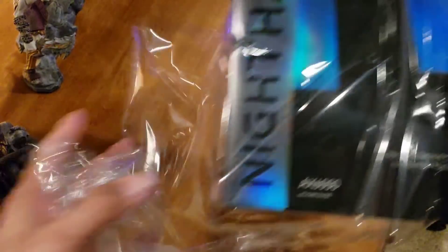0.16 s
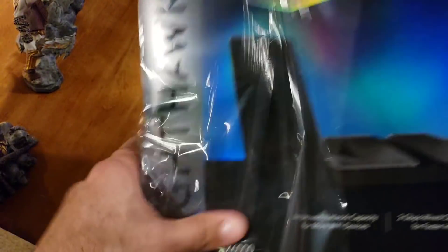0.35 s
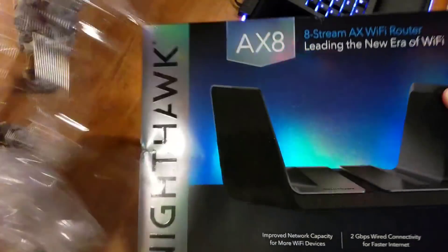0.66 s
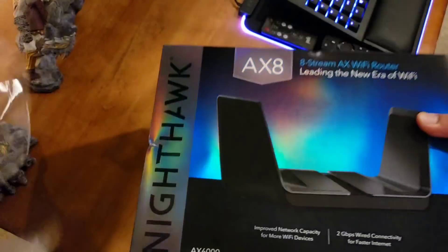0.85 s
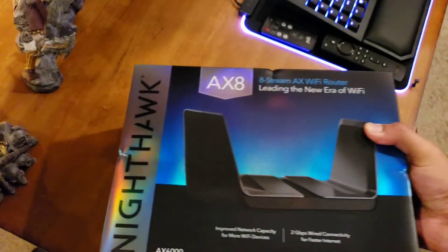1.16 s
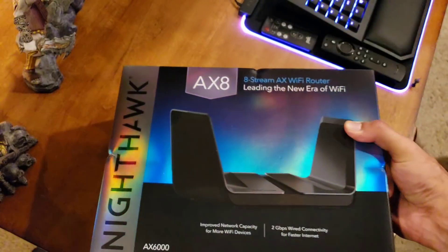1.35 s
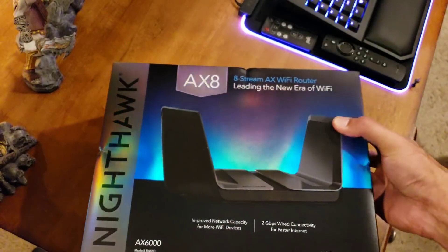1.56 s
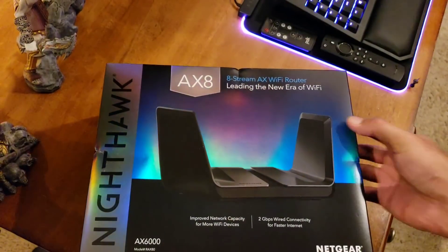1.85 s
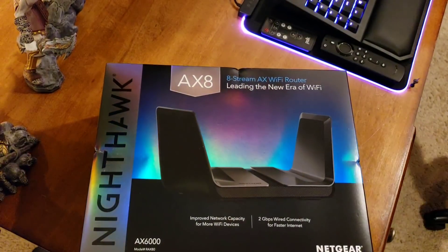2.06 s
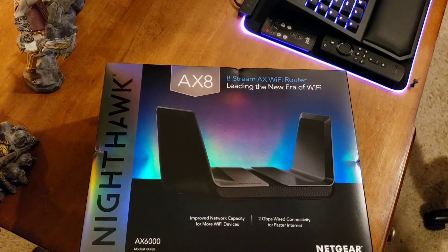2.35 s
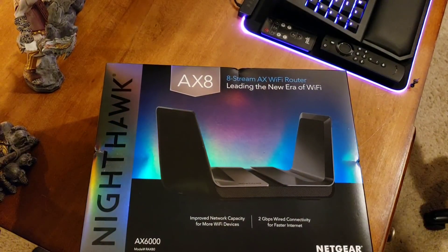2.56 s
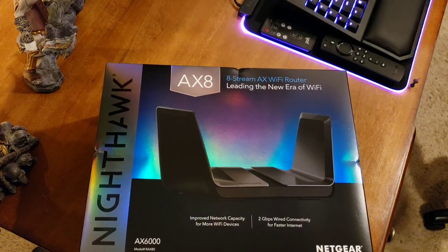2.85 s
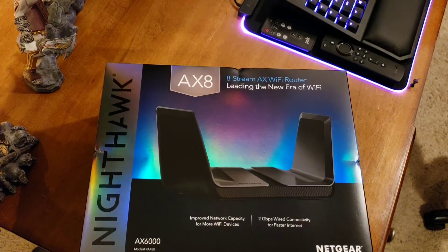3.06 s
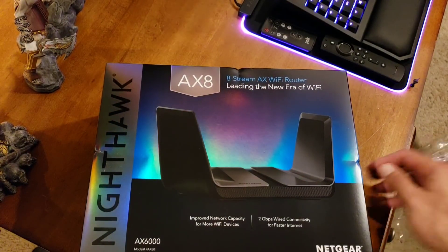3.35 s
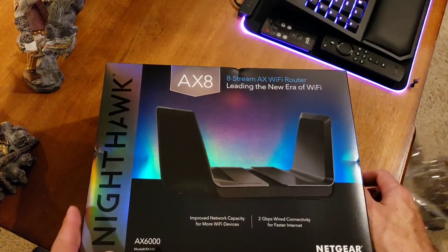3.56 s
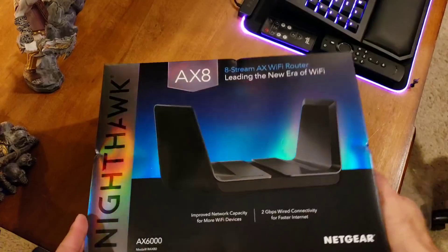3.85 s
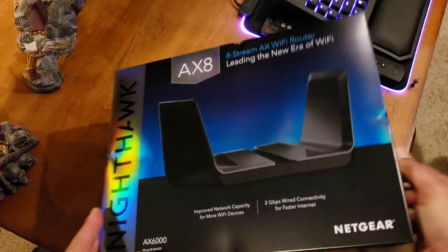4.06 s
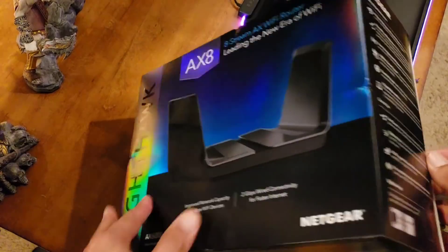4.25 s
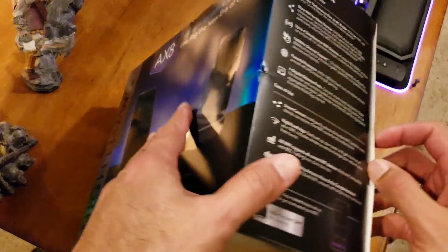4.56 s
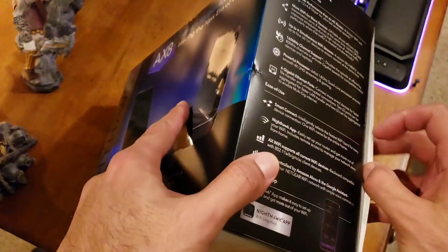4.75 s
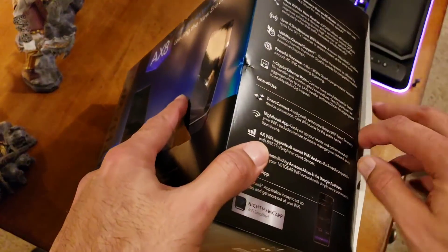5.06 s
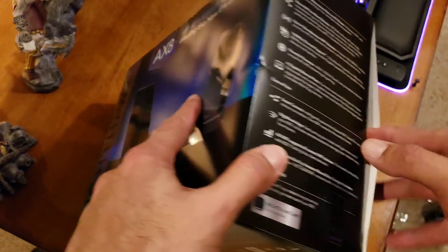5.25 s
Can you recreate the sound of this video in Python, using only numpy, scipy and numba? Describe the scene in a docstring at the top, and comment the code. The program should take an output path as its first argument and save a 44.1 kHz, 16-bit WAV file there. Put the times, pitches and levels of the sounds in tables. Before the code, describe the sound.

Close to the microphone in a small quiet room, plastic film crackles and snaps as it comes off a box. The cardboard box knocks a few times and lands on a desk with a hollow thud. The film is then scrunched up, the loudest moment, and fades to a few ticks. Afterwards skin rubs softly on the card, the box bumps as it is tipped, and fingernails click at the flap.

```python
"""Unwrapping a cardboard box.

Thin plastic wrap is pulled off, crumpled and dropped: its creases snap in dense showers.
The hollow box is set on a desk and thuds in its modes. Hands slide over it, tip it up and pick
at the flap: skin rasps, nails tick. Close microphone, small quiet room."""
import sys
import numpy as np
from scipy import signal
from scipy.fft import rfft, irfft
from scipy.io import wavfile
from scipy.ndimage import uniform_filter1d, map_coordinates
from numba import njit

SR = 44100
rng = np.random.default_rng(int(sys.argv[2]) if len(sys.argv) > 2 else 0)


def log_audio(samples):
    """Write samples as a 16-bit WAV file to the path given in sys.argv[1]."""
    # one column per channel
    frames = np.atleast_2d(samples).T
    # limit to full scale, then quantise
    limited = np.clip(frames, -1, 1)
    pcm = np.round(limited * 32767).astype(np.int16)
    wavfile.write(sys.argv[1], SR, pcm)


N = 237851

# film being worked: time_s, crackle_db, fine_re_crackle_db
FILM_LEVELS = [(0, -35.5, -4), (.11, -41.5, 3), (.16, -33.5, 0), (.21, -35, -1.5), (.25, -39, 0),
               (.43, -31.5, -2.5), (.445, -30, 2.5), (.53, -29, 3.5), (.595, -37.5, 6), (0.634, -26, 1.5),
               (.68, -37, 2.5), (.75, -37.5, 0), (.8, -33.5, 5), (.92, -33, -1), (1.07, -36, -1),
               (1.12, -28.5, -3), (1.18, -33, 2.5), (1.28, -32, -1.5), (1.4, -33.5, -6.5),
               (1.47, -40.5, -6), (1.7, -43.5, -0.5), (1.85, -44.5, -11), (2.05, -43.5, -9),
               (2.18, -40, 6.5), (2.35, -33, 1), (2.395, -23, 2.5), (2.57, -21.5, 1), (2.62, -25, -1),
               (2.71, -26.5, 1), (2.75, -34.5, -1.5), (2.785, -51.5, 1), (2.85, -41, -3), (3.0, -41, 0),
               (3.049, -34, -0.5), (3.1, -44, 3.5), (3.27, -49, 1.5), (3.43, -57.5, -6), (3.62, -59, 4)]
# single loud creases: start_s, ring_peak_db, pitch_hz, treble_re_ring_db
CREASE_SNAPS = [(0.0347, -15.5, 3420, -17), (0.0754, -16, 11600, -15), (0.0894, -17.5, 2620, -3),
                (0.1349, -15.5, 3020, -4), (0.1838, -15.5, 1500, -15), (0.2171, -13, 10600, -15),
                (0.395, -13.5, 11900, -7), (0.4399, -12, 1510, -13), (0.4485, -17, 10680, 9.5),
                (0.5026, -6, 11900, 10), (0.5351, -15.5, 11100, 6), (0.6081, -14, 12060, 2),
                (0.6444, -12, 9990, -5), (0.688, -15, 11630, -12), (0.6998, -16, 2130, -6),
                (0.7251, -16, 11280, -9), (0.7605, -16, 10420, -7), (0.7847, -15.5, 7070, 0),
                (0.8344, -19, 7360, -2), (1.0391, -14, 13950, -7), (1.049, -19, 2410, -9),
                (1.062, -15.5, 1980, -12), (1.0892, -17, 2800, -18), (1.1752, -10, 2280, -4),
                (1.2155, -15, 11280, -3), (1.2814, -15, 10250, 0), (1.2864, -12, 2740, -17),
                (1.3221, -15, 11800, -8), (1.422, -12.5, 2670, -22), (1.4517, -19, 3720, -8),
                (1.4822, -13.5, 3130, -24), (1.5206, -21, 12140, -7), (1.5582, -26, 2930, 1),
                (1.6019, -24.5, 3010, -19), (1.6801, -24, 2500, -8), (1.7428, -23.5, 10590, -15),
                (1.7511, -21, 4220, -12), (1.8169, -24.5, 1960, -22), (1.8392, -27, 6760, -7),
                (1.8813, -13.5, 7900, -10), (1.9681, -14.5, 8400, -23), (2.0216, -22.5, 6000, -11),
                (2.0305, -17.5, 2480, -22), (2.0426, -15, 6060, -15), (2.0536, -27, 3500, -6),
                (2.0822, -23, 2840, -15), (2.1488, -15.5, 9900, -17), (2.1667, -22, 4140, 7),
                (2.1903, -18, 6370, -8), (2.2076, -17.5, 6980, -7), (2.2953, -12, 7300, -16),
                (2.3299, -9.5, 5100, -0.5), (2.3829, -4.5, 2570, 0.5), (2.4138, -4, 12600, 1),
                (2.4626, -8, 10500, 3), (2.4956, -4, 13010, -8), (2.5281, -2, 6100, -10),
                (2.5518, -6, 12200, -9), (2.5609, 4.5, 3330, -21), (2.5785, -3, 7400, -15),
                (2.4778, -13, 5500, -5), (2.6212, -6.5, 5600, -10), (2.6413, -7.5, 4200, -3),
                (2.8679, -21, 7200, -19), (2.9209, -22.5, 7860, -12), (3.1412, -19, 8140, -9),
                (3.15, -20.5, 4800, -19), (3.2163, -19.5, 10000, -14), (3.2572, -24, 2480, -15),
                (3.3158, -23.5, 6100, -22), (3.3813, -33, 8500, -8), (3.4754, -25, 7600, -20),
                (3.5078, -35, 4820, -13)]
# blows on the box: start_s, peak_db, spot_hz, spread_octaves
BOX_KNOCKS = [(.05, -30.5, 483, 0.64), (0.121, -37, 158, 0.19), (0.4393, -20, 614, 1.3),
              (0.627, -26.5, 520, 1.15), (.642, -23, 506, 0.33), (0.942, -34, 180, 0.7),
              (1.004, -30.5, 147, 0.41), (1.015, -29, 200, 0.83), (1.391, -25, 364, 0.57),
              (1.424, -18, 273, 1.06), (1.504, -34.5, 140, 0.58), (1.673, -30.5, 400, 1.9),
              (1.912, -19.5, 453, 1.9), (1.922, -17.5, 1500, 0.59), (1.923, -11.5, 224, 1.08),
              (2.388, -26, 260, 1), (3.472, -42, 420, 0.3), (3.631, -32, 303, 1.2),
              (3.725, -36.5, 805, 0.76), (3.792, -33, 554, 0.94), (3.898, -39, 405, 0.12),
              (4.014, -20, 830, 0.52), (4.018, -19, 230, 0.18), (4.298, -45, 199, 0.72),
              (4.7, -33.5, 179, 0.59), (4.772, -37, 175, 0.43), (4.926, -21.5, 684, 0.97),
              (4.971, -24, 457, 0.88), (5.091, -30, 900, 0.46), (5.099, -31.5, 404, 0.17),
              (5.152, -29, 390, 0.69), (5.331, -37, 219, 0.65)]
# hollow box: pitch_hz, level_db, t60_s
BOX_MODES = [(65, -13, .12), (105, -9, .14), (130, -9, .18), (180, -9, .09), (229, 0, .12), (280, -7, .07),
             (352, -4, .1), (420, -7, .09), (505, -8, .09), (600, -8, .09), (700, -10, .07), (855, -9, .05),
             (1050, -11, .045), (1440, -12, .035), (1700, -13, .035)]
# skin on glossy card: start_s, length_s, rub_db, fade_db, hiss_re_rub_db, hiss_rise_db, drum_re_rub_db
HAND_STROKES = [(3.602, 0.24, -51.5, 1, -8, -4, -1), (3.849, 0.19, -43.5, 5.5, -15, 9, -2.5),
                (3.974, .13, -32.5, 5, -13, 7, -0.5), (4.1, .26, -37, 7, 2.5, -7.5, -1),
                (4.348, 0.12, -41.5, 4, 6, -8, -7), (4.482, 0.25, -45, -0.5, 7.5, -18, -6.5),
                (4.724, 0.084, -51.5, 5, -17, 0, 5), (4.79, 0.096, -40.5, 3.5, -3.5, -2, -14),
                (4.898, 0.084, -34.5, 13.5, -11, -5, -1), (4.988, 0.049, -53, 0.5, -17, 0, 4),
                (5.046, 0.059, -47, -3.5, -7, -4, 0.5), (5.11, 0.26, -57.5, 2, -14, 0, 8),
                (5.28, .14, -53.5, -7.5, -8, 4, -12)]
# nails catching the card: start_s, ring_peak_db, pitch_hz, treble_re_ring_db
NAIL_PICKS = [(3.6338, -25.5, 3100, -6), (3.6555, -31, 8440, -15), (3.6773, -37, 3430, -12),
              (3.7242, -29.5, 8000, -18), (3.7278, -23, 1880, -17), (3.74, -29, 1620, -12),
              (3.7946, -28, 2760, -8), (3.9381, -29, 7300, -22), (4.0122, -20.5, 2070, -7),
              (4.0195, -23, 1890, -12), (4.7079, -29.5, 3300, -17), (4.9295, -11.5, 3450, -28),
              (4.9705, -35, 1710, -8), (5.0897, -13, 3360, -20), (5.0946, -13.5, 3330, -25),
              (5.099, -28, 2000, -16), (5.1516, -32.5, 3200, -21)]
# film's reflection off a close surface: time_s, amplitude_ratio
ECHO_SHARE = [(0, 0.068), (.6, 0.17), (1.7, 0.22), (2.3, 0.032)]
# room tone spectrum: freq_hz, density_db
ROOM_SPECTRUM = [(15, -34), (25, 4.5), (463, 1), (988, -19), (1520, -4), (1790, -19), (2280, -49.5),
                 (3820, -17), (9320, -21), (16000, -24)]
# microphone response: freq_hz, gain_db
MIC_RESPONSE = [(40, -2), (120, -2.5), (700, -1), (2500, -1.5), (6500, -1.17), (9200, -1), (12000, -1),
                (14500, -0.5), (16000, -9)]


def film():
    """Creases flip in clusters, each with a coarse and a fine part, over a rustle of tiny ones."""
    coarse, fine = film_gains()
    when, strength, coarse_pitch, fine_pitch, balance = rng.random((9000, 5)).T
    pace = np.cumsum(flicker(45, 5.5))
    start = np.searchsorted(pace, when * pace[-1]).clip(0, N - 1)
    size = undb(np.minimum(-4.5 * np.log(strength), 17))  # many small, few large
    fine_size = size * undb(12 * (balance - .5))
    big = unit(bursts(start, hz=900 * 4.55 ** coarse_pitch, q=.73, fade_ms=.52, size=size))
    small = unit(bursts(start, hz=5500 * 2.7 ** fine_pitch, q=1.8, fade_ms=.22, size=fine_size))
    stir = flicker(21.92, 2.24)
    crackle = coarse * (undb(-.5) * big + undb(-2.5) * stir * band(950, 4840))
    fizz = fine * (undb(-3) * small + undb(-5.5) * stir ** .3 * band(3700, 12600))
    air_push = undb(-15) * coarse ** 1.4 * flicker(11, 4.5) * band(44, 150)
    sheet_flap = undb(-22) * coarse ** .7 * flicker(30, 2.5) * band(172, 770)
    snap_rows = np.vstack([CREASE_SNAPS, small_snaps()])
    snaps = clicks(snap_rows, ring_q=3.8, fade_ms=.51, crack_db=-4, crack_q=.75)
    return crackle + fizz + air_push + sheet_flap + snaps


def film_gains():
    """Coarse and fine crackle gains per sample; silent once the film rests."""
    time_s, crackle_db, fine_db = np.transpose(FILM_LEVELS)
    t = np.arange(N) / SR
    return [undb(np.interp(t, time_s, db, -120, -120)) for db in (crackle_db, crackle_db + fine_db)]


def small_snaps(count=260):
    """Rows of lesser snaps: random times and pitches, peaks above the crackle."""
    time_s, crackle_db, _ = np.transpose(FILM_LEVELS)
    when, strength, pitch, treble = rng.random((count, 4)).T
    start_s = when * time_s[-1]
    peak_db = np.interp(start_s, time_s, crackle_db) + 8.5 + 8 * strength ** 2
    return np.transpose([start_s, peak_db, 1700 * 5.66 ** pitch, -8.5 + 12 * (treble - .5)])


def knocks(held_from_s=4.5, held_damping=1.7):
    """Each spot wakes the box modes near its pitch; a gripping hand shortens the ring."""
    out = np.zeros(N + SR // 2)
    t = np.arange(SR // 2)[:, None] / SR
    hz, mode_db, t60_s = np.transpose(BOX_MODES)
    polarity = (-1) ** np.arange(len(hz))
    onset = 1 - np.exp(-t * hz / .067)  # the card gives way
    for start_s, peak_db, spot_hz, octaves in BOX_KNOCKS:
        reach = undb(mode_db - 6.6 * (np.log2(hz / spot_hz) / octaves) ** 2)
        damping = held_damping if start_s > held_from_s else 1
        phase = .5 * rng.standard_normal(len(hz))
        modes = np.sin(2 * np.pi * hz * t + phase) * decay(t, t60_s / damping)
        ring = (modes * onset) @ (reach * polarity)
        i = int(start_s * SR)
        out[i:i + len(ring)] += undb(peak_db) * ring / np.abs(ring).max()
    return out[:N]


def hands():
    """Skin on card rasps, hisses and drums the box; nails tick."""
    rub, hiss, drum = stroke_gains()
    grip = flicker(35, 1.6)
    grain = flicker(400, 1.67)
    friction = band(330, 4650) + undb(-4) * band(3570, 8400)
    flap_ring = undb(-10) * band(2800, 3430)
    rasp = rub * grip * grain * (friction + flap_ring)
    drumming = unit(box_ring(band(104, 3300))) + undb(-4.5) * band(130, 1840)
    drumming *= flicker(20.77, 1.5)
    sheen = band(8300, 13800) + .34 * band(10200, 13300)
    nails = clicks(NAIL_PICKS, ring_q=5, fade_ms=.7, crack_db=-4.5, crack_q=1.3)
    return rasp + hiss * grip * sheen + drum * drumming + nails


def stroke_gains(attack_s=.044, release_s=.012):
    """Rub, hiss and drum gains per sample; strokes add in power."""
    t = np.arange(N) / SR
    power = 0
    for start_s, length_s, rub_db, fade_db, hiss_db, rise_db, drum_db in HAND_STROKES:
        age_s = t - start_s
        along = np.clip(age_s / length_s, 0, 1)
        attack = np.clip(age_s / attack_s, 0, 1)
        release = np.exp(-np.maximum(age_s - length_s, 0) / release_s)
        level_db = rub_db - fade_db * along
        layers_db = [level_db, level_db + hiss_db + rise_db * along, level_db + drum_db]
        power += (attack * release * undb(layers_db)) ** 2
    return np.sqrt(power)


def box_ring(force):
    """Box modes as resonators driven by a force."""
    out = 0
    for hz, db, t60_s in BOX_MODES:
        radius, angle = decay(1 / SR, t60_s), 2 * np.pi * hz / SR
        out += undb(db) * signal.lfilter([1, 0, -1], [1, -2 * radius * np.cos(angle), radius ** 2], force)
    return out


def close_echo(x, delay_ms=.217):
    """A close surface returns an inverted copy: a comb of broad humps."""
    i = np.arange(N)
    share = np.interp(i / SR, *np.transpose(ECHO_SHARE))
    return x - share * map_coordinates(x, [i - delay_ms * SR / 1000], order=3)


def room(x, t60_s=.22, tail_db=-16.5):
    """Walls add a short tail; treble dies first, bass stays dry."""
    t = np.arange(SR // 2) / SR
    mids = band(207, 7100)[:len(t)] * decay(t, t60_s)
    treble = 1.37 * band(3000, 14000)[:len(t)] * decay(t, .15 * t60_s)
    tail = (mids + treble) * (t > .003)
    return x + undb(tail_db) * signal.fftconvolve(x, tail / np.linalg.norm(tail))[:N]


def room_tone(rms_db=-54):
    """Steady low background noise."""
    return undb(rms_db) * unit(colour(rng.standard_normal(N + 1), ROOM_SPECTRUM)[:N])


def clicks(table, ring_q, fade_ms, crack_db, crack_q):
    """Each click: pitched ring, broad crack, treble tick."""
    start_s, db, hz, treble_db = np.transpose(table)
    start = (start_s * SR).astype(np.int64)
    ring = bursts(start, hz, ring_q, fade_ms, undb(db), by_peak=True)
    crack = bursts(start, 2070, crack_q, fade_ms, undb(db + crack_db), by_peak=True)
    tick = bursts(start, 11500, 1.5, .9 * fade_ms, undb(db + treble_db), by_peak=True)
    return ring + crack + tick


def bursts(start, hz, q, fade_ms, size, by_peak=False):
    """Decaying noise bursts, each through its own resonance; by_peak makes size the peak."""
    pitch_hz = np.full(len(start), hz, float)
    return render_bursts(start, pitch_hz, float(q), fade_ms * SR / 1000, size,
                         rng.standard_normal(N), by_peak)


@njit
def render_bursts(start, hz, q, fade_samples, size, noise, by_peak):
    """Sample loop: one state-variable band-pass per burst."""
    out = np.zeros(N + 512)
    for e in range(len(start)):
        g = np.tan(np.pi * hz[e] / SR)
        band_state, low_state, envelope = 0., 0., 1.
        burst = np.zeros(min(512, int(7 * fade_samples + 4 * q * SR / hz[e])))
        for i in range(len(burst)):
            attack = min(1., (i + 1) / (.4 * fade_samples))
            drive = envelope * attack * noise[(start[e] + 977 * e + i) % N]
            envelope *= 1 - 1 / fade_samples
            passed = (band_state + g * (drive - low_state)) / (1 + g * (g + 1 / q))
            band_state = 2 * passed - band_state
            low_state += 2 * g * passed
            burst[i] = passed / q
        gain = size[e] / np.abs(burst).max() if by_peak else size[e]
        out[start[e]:start[e] + len(burst)] += gain * burst
    return out[:N]


def band(lo_hz, hi_hz):
    """Band noise, rms 1."""
    sos = signal.butter(2, [lo_hz, hi_hz], "band", fs=SR, output="sos")
    return unit(signal.sosfilt(sos, rng.standard_normal(N)))


def flicker(rate_hz, depth_db):
    """Randomly wandering gain."""
    hold = int(SR / rate_hz)
    steps = np.repeat(rng.standard_normal(N // hold + 1), hold)
    return undb(depth_db * uniform_filter1d(steps, hold)[:N])


def colour(x, points):
    """Filter by (freq_hz, gain_db) points."""
    hz, db = np.transpose(points)
    bin_hz = np.maximum(np.arange(len(x) // 2 + 1) * SR / len(x), 1)
    return irfft(rfft(x) * undb(np.interp(np.log(bin_hz), np.log(hz), db)), len(x))


def decay(t, t60_s):
    return np.exp(-np.log(1000) * t / t60_s)


def undb(db):
    return 10 ** (np.asarray(db) / 20)


def unit(x):
    return x / np.sqrt(np.mean(x ** 2))


def scene():
    """Film, box and hands in the room, mono."""
    background = room_tone()
    return (room(close_echo(film()) + knocks() + hands()) + background)[None]


def record(dry):
    """The microphone colours the sound, rounds the peaks and cuts the top."""
    drive, cutoff_hz = 1.1, 15700
    coloured = colour(np.append(dry[0], 0), MIC_RESPONSE)[:N]
    rounded = np.tanh(drive * coloured) / drive
    lowpass = signal.ellip(12, .3, 100, cutoff_hz, fs=SR, output="sos")
    return signal.sosfilt(lowpass, rounded)[None]


dry = scene()
out = record(dry)
log_audio(out)
```